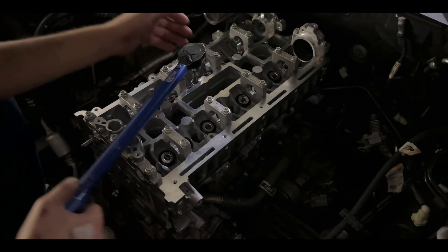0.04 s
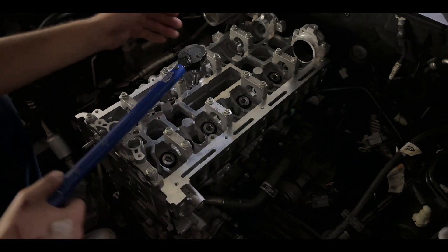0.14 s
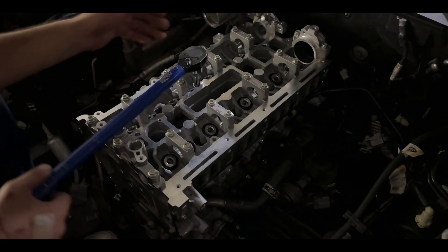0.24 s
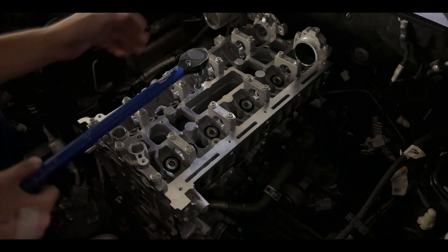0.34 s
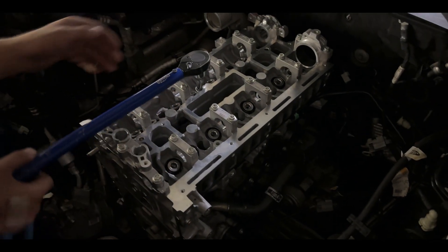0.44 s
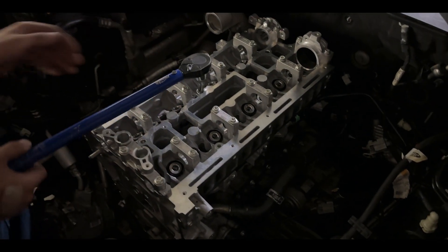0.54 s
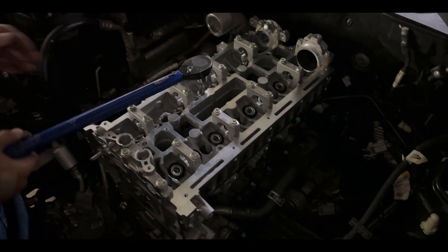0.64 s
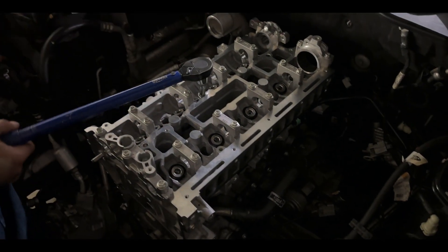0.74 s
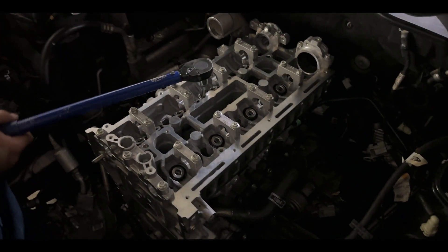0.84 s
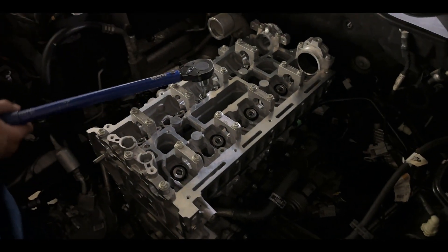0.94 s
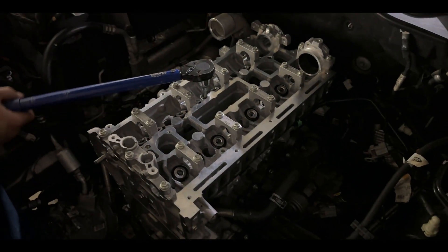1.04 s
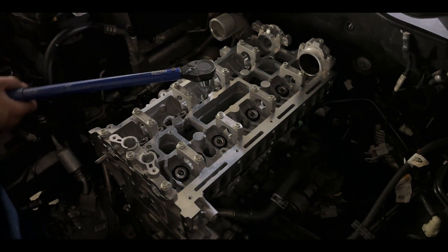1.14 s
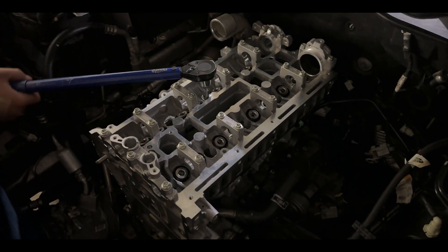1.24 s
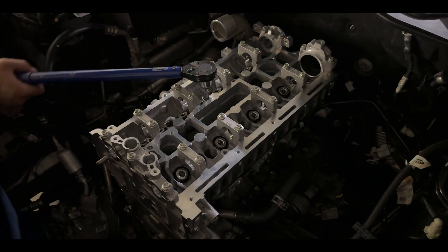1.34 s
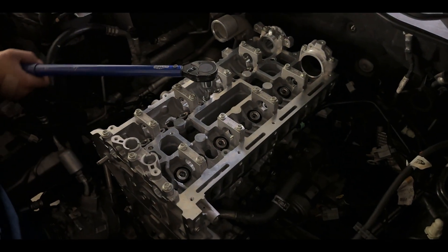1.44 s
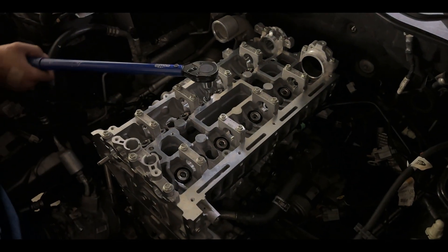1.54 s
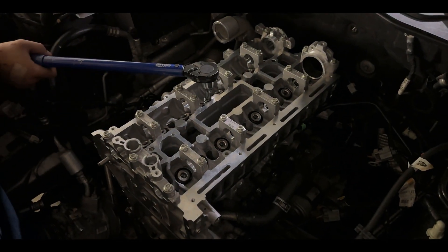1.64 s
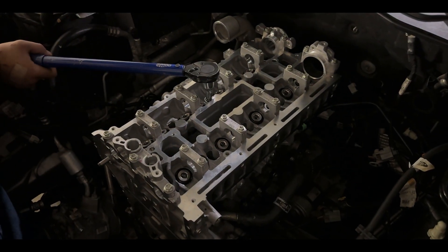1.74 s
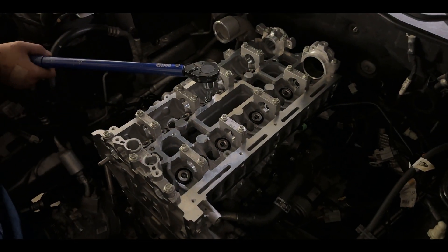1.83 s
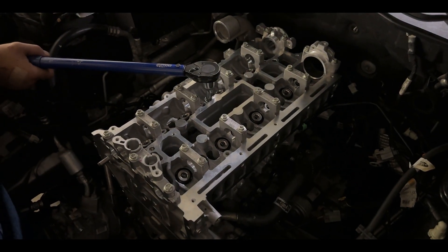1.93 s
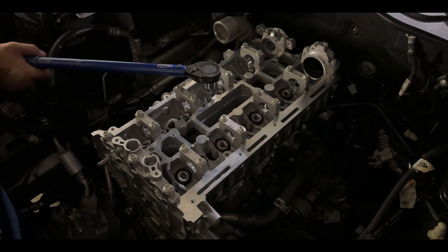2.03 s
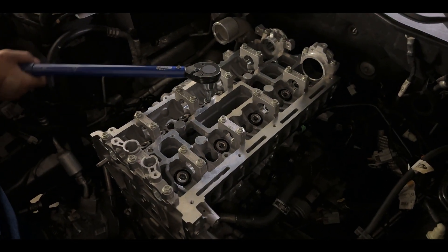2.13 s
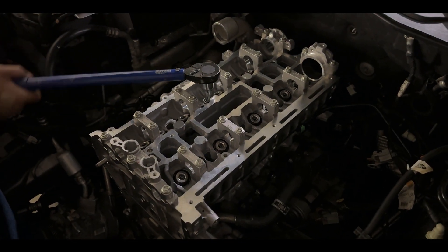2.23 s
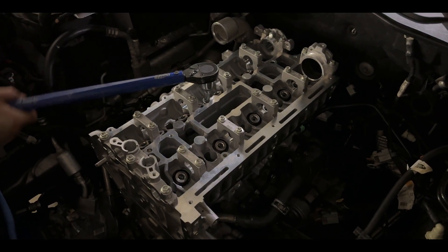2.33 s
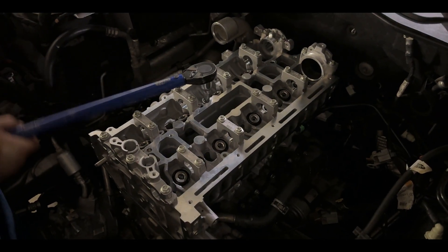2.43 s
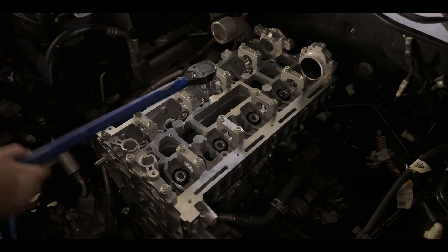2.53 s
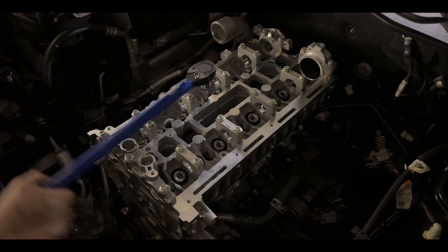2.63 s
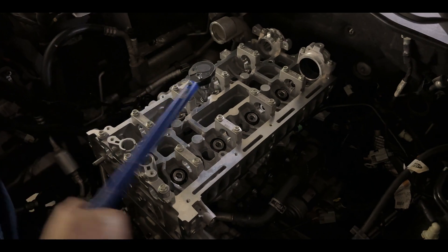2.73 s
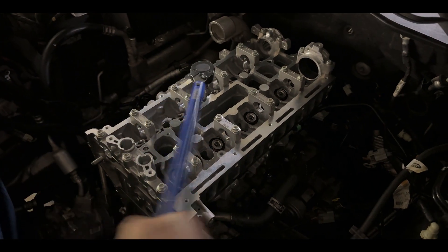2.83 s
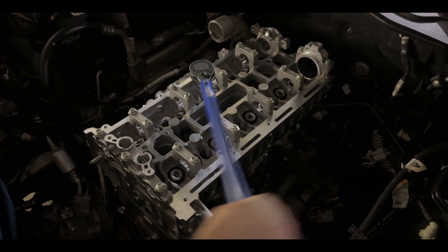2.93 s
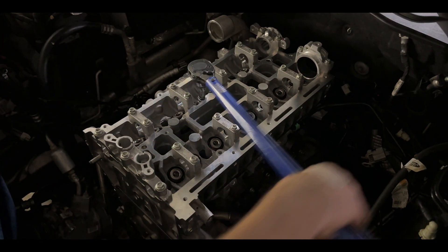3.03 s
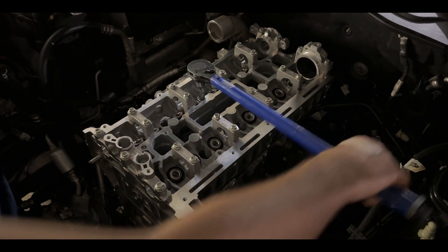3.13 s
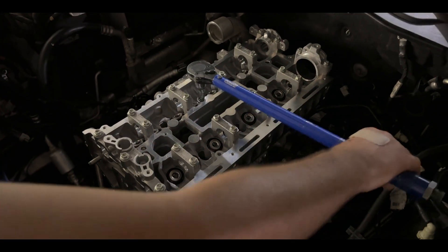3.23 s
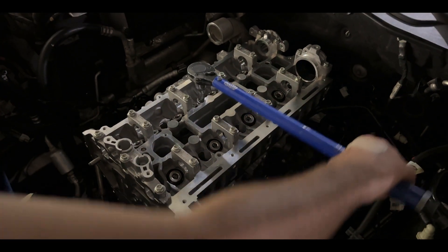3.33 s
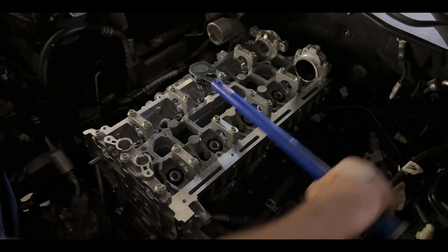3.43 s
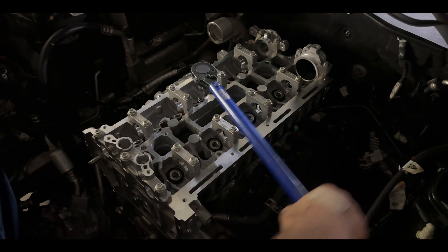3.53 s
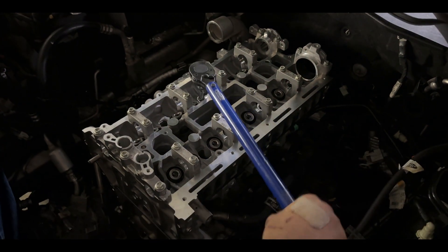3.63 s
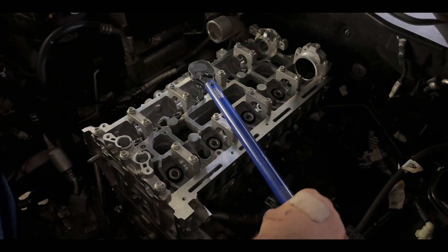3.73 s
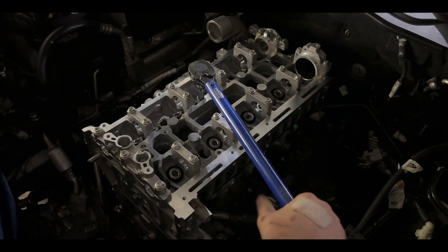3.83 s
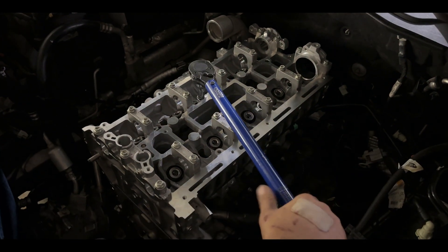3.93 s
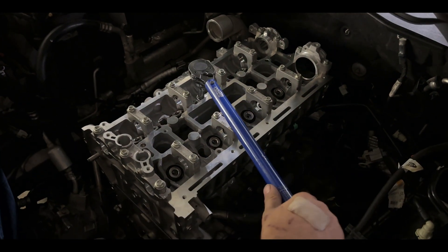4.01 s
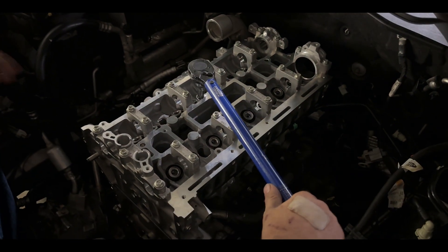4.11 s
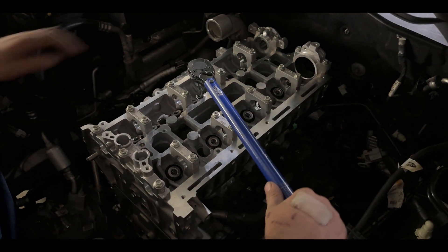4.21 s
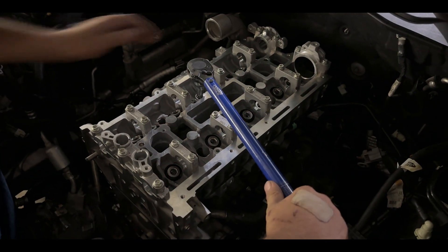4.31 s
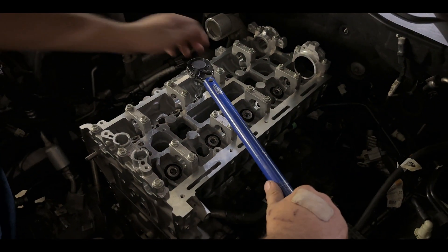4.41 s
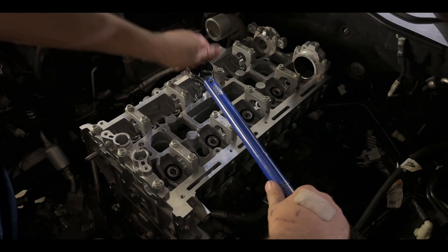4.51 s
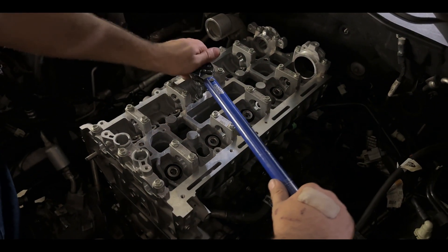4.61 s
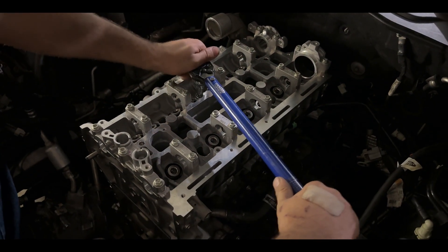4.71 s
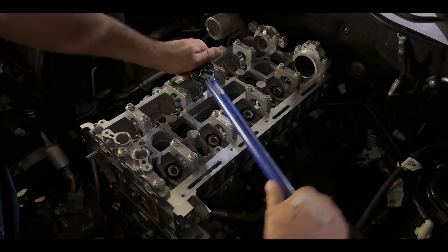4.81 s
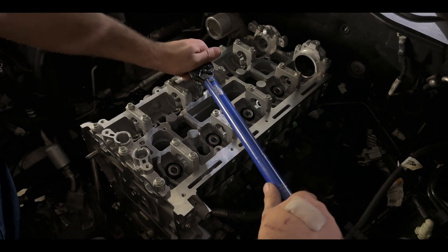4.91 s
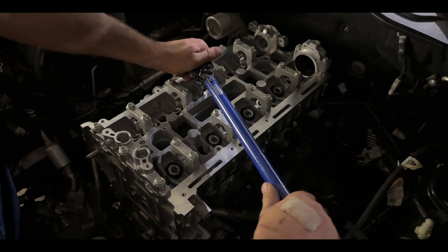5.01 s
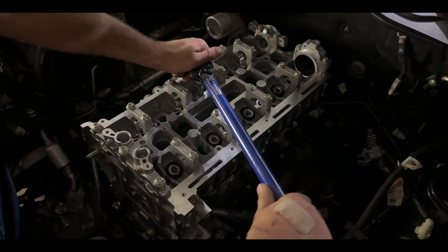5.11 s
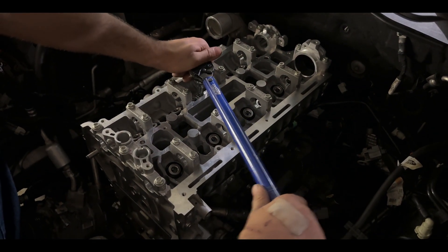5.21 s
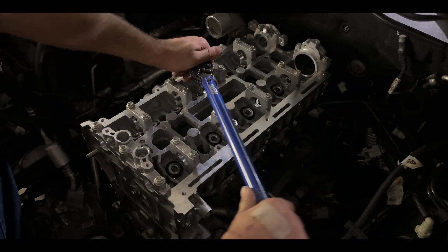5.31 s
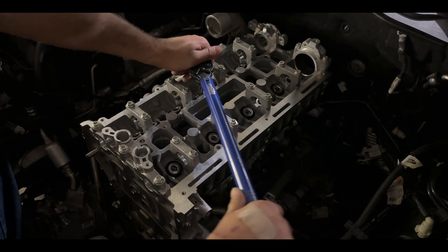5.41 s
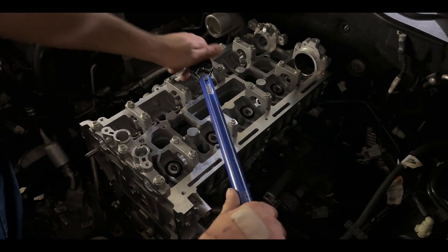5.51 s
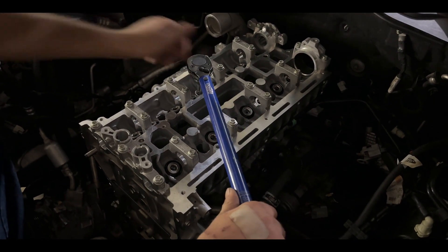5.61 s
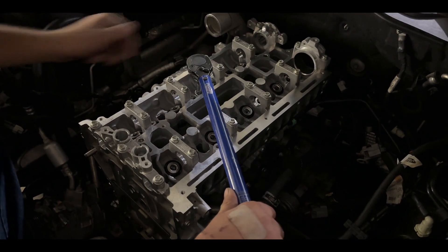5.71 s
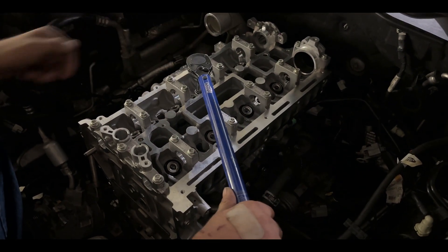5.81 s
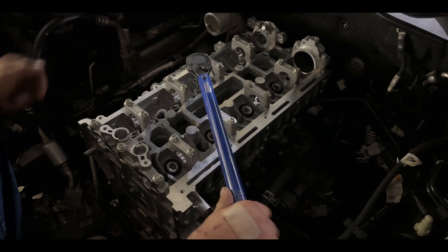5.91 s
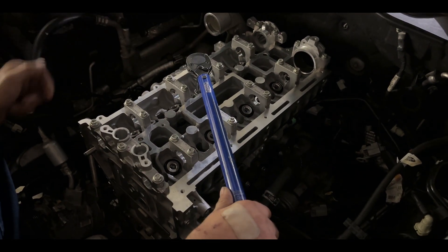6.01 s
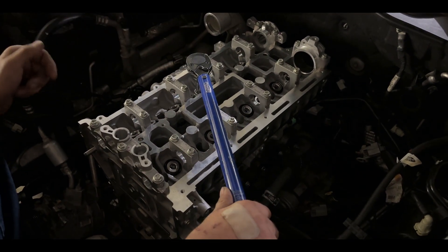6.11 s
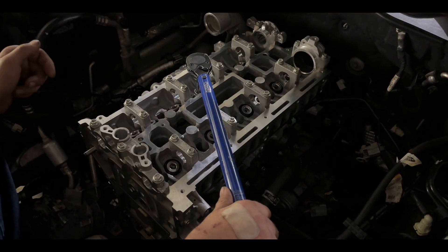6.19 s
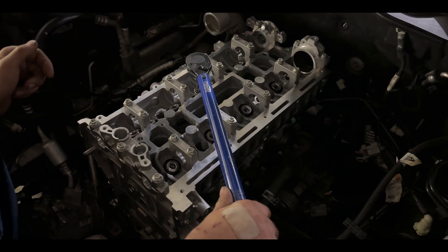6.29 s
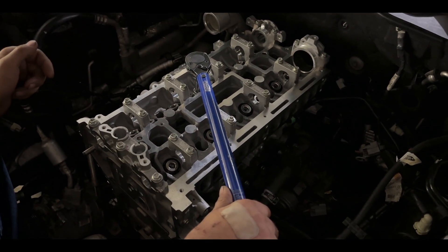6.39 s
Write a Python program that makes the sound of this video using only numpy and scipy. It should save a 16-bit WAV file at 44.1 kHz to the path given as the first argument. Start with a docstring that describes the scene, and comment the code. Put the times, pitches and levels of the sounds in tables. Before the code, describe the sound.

Over a faint electrical hum and low rumble, clothing shifts and a steel socket scrapes and knocks softly on an engine bolt. A ratchet clicks brightly eight times in under a second, the loudest sound. A few small knocks follow, and then the torque wrench snaps once, ringing briefly and jolting the engine. The clicks sound close, with the short reverberation of a small workshop.

```python
"""A small workshop, where a click-type torque wrench tightens a bolt on a cylinder head.
Mains hum and a low rumble lie underneath. Clothes rustle and dry steel scrapes on the first pull,
the handle swings back and the pawl drops over eight ratchet teeth, and the socket knocks softly
as it takes up its play. On the second pull the torque mechanism breaks over with one sharp click
that rings the tubular handle and sends a clunk into the engine."""
import sys
import numpy as np
from scipy import signal
from scipy.fft import rfft, irfft, next_fast_len
from scipy.io import wavfile
from scipy.ndimage import map_coordinates

SR = 44100
rng = np.random.default_rng(int(sys.argv[2]) if len(sys.argv) > 2 else 0)


def dump_mix(stems):
    """Bounce the given channels to the path in sys.argv[1] as a 16-bit WAV at rate SR."""
    frames = np.atleast_2d(stems).T  # one column per channel
    limited = np.clip(frames, -1, 1)  # hard clip at full scale
    pcm = np.round(limited * 32767).astype(np.int16)
    wavfile.write(sys.argv[1], SR, pcm)


N = 284471
PRE_ROLL_S = .01  # space ahead of each snap for its lead-in scrape


def amp(db):
    """Decibels to gain."""
    return 10 ** (np.asarray(db) / 20)


def unit(x):
    """Scale to rms 1."""
    return x / np.sqrt(np.mean(x ** 2) + 1e-20)


def along(points, hz):
    """Read (frequency [Hz], value) points on a log axis."""
    f, v = np.transpose(points)
    return np.interp(np.log(hz + 1), np.log(f + 1), v)


def wobble(rate):
    """A smooth random curve, rate knots a second."""
    knots = rng.standard_normal(int(N * rate / SR) + 4)
    return map_coordinates(knots, [np.arange(N) * rate / SR])


def filtered(x, response):
    """Shape x with a frequency response."""
    n = x.shape[-1]
    padded = next_fast_len(n + 8192)
    return irfft(rfft(x, padded) * response(np.fft.rfftfreq(padded, 1 / SR)), padded)[..., :n]


def noise(spectrum, side_db, size):
    """Coloured stereo noise of rms 1; side_db is a number or (frequency [Hz], level [dB]) points."""
    width = lambda hz: along(side_db, hz) if np.ndim(side_db) else side_db + 0 * hz
    response = lambda hz: amp(along(spectrum, hz) + np.array([0 * hz, width(hz)]))
    mid, side = filtered(rng.standard_normal((2, size)), response)
    return unit(np.array([mid + side, mid - side]))


def add(track, s, sound):
    """Mix a sound into the track at time s."""
    start = max(round(s * SR), 0)
    track[:, start:start + sound.shape[1]] += sound[:, :N - start]


def in_room(x, wet_db):
    """A short sound plus the workshop's diffuse tail, which hangs on longest in the lows."""
    # reverb decay: (frequency [Hz], t60 [s])
    decay = [(200, .69), (650, .4), (2500, .43), (7000, .4), (9500, .37), (12000, .28), (15000, .23)]
    # reverb tone: (frequency [Hz], level [dB])
    colour = [(200, 10), (750, 6), (1200, 0.5), (2800, -4), (6500, 1.5), (7800, -0.5), (8600, -7),
              (10000, -2), (11500, -5), (15000, -4.5)]
    hz, t, bands = signal.stft(rng.standard_normal((2, SR // 2)), SR, nperseg=256)
    build_up = 1 - np.exp(-t / .007)
    fade = amp(along(colour, hz)[:, None] - 60 * t / along(decay, hz)[:, None])
    tail = signal.istft(bands * build_up * fade, SR, nperseg=256)[1]
    wet = signal.fftconvolve(x, tail / np.linalg.norm(tail[0]), axes=1)
    return x + amp(wet_db) * wet[:, :x.shape[1]]


def room_tone():
    """Wavering mains hum over a low drifting rumble and faint hiss."""
    # lowest and highest hum lines: (frequency [Hz], base level [dB])
    hum_lines = [(59.2, -65.5), (238, -81)]
    # level ride of the middle hum line: (time [s], level [dB])
    hum_ride = [(0.0, -63.5), (0.16, -53.5), (0.49, -68.5), (0.54, -59), (1.29, -60), (1.4, -70.5),
                (1.58, -51.5), (1.78, -62), (2.44, -60), (2.49, -75.5), (2.66, -53), (2.89, -67),
                (3.07, -51.5), (3.29, -67), (3.48, -53.5), (3.72, -65.5), (4.67, -59), (4.71, -72.5),
                (4.83, -59), (6.45, -62)]
    # rumble spectrum: (frequency [Hz], level [dB])
    rumble_colour = [(12, -72.5), (20, -37), (27, -24.5), (43, -7.5), (65, 0), (80, -1), (95, -5),
                     (118, -4), (134, -8), (161, -14.5), (226, -15.5), (308, -25.5), (500, -30.5),
                     (650, -60), (1100, -120)]
    # hiss spectrum: (frequency [Hz], level [dB])
    hiss_colour = [(290, -33), (500, -5), (545, -9), (1300, -18.5), (1460, -11.5), (1640, -22.5),
                   (2890, -18), (3540, -21), (7000, -22.5), (11000, -31.5), (16000, -31)]
    t = np.arange(N) / SR

    def hum(hz, db):
        """A sine whose level and phase wander."""
        gain = np.sqrt(2) * amp(db + 1.2 * wobble(2.8))
        return gain * np.sin(2 * np.pi * hz * t + .4 * wobble(16))

    low, high = [hum(hz, db) for hz, db in hum_lines]
    middle = hum(hz=118.9, db=np.interp(t, *np.transpose(hum_ride)) - .5)
    swell = amp(5.5 * np.exp(-((t - 2.9) / .9) ** 2 / 2))  # the lowest line crests once, at 2.9 s
    rumble = amp(-59.5 + wobble(2.8)) * noise(rumble_colour, side_db=-18.5, size=N)
    hiss = amp(-82) * noise(hiss_colour, side_db=-1.5, size=N)
    return swell * low + middle + high + rumble + hiss


def thumps():
    """Dull, soft-edged low thumps: the body shifting, and the jolt as the wrench breaks over."""
    # low thumps, the last one the wrench's jolt: (time [s], level [dB])
    hits = [(0.112, -61), (1.024, -54.5), (1.507, -50), (3.04, -58), (5.289, -50.5)]
    # thump spectrum: (frequency [Hz], level [dB])
    colour = [(50, -12), (90, -19.5), (130, 3), (200, -8), (260, -2.5), (400, -20.5),
              (900, -56.5), (2000, -100)]
    out, t = np.zeros((2, N)), np.arange(SR // 2) / SR
    rise_s, t60_s = .0081, .251
    envelope = amp(-60 * t / t60_s) * (1 - np.exp(-t / rise_s))
    for s, db in hits:
        add(out, s, amp(db) * envelope * noise(colour, side_db=-21.5, size=len(t)))
    return out


def mechanic():
    """Each movement swells and dies away, rubbing the clothes and giving a gritty shuffle."""
    # body moves: (crest time [s], swish level [dB], shuffle level [dB], rise [s], 20 dB fade [s])
    moves = [(0.06, -83.5, -70, 0.29, 1.2), (0.392, -75.5, -77, 0.127, 0.4),
             (0.456, -64.3, -76, 0.0613, 0.4085), (0.565, -71, -69, 0.152, 0.6741),
             (0.93, -71, -68, 0.14, 0.2631), (1.04, -75.5, -67.5, 0.107, .22),
             (1.27, -85, -75, 0.093, 0.18), (1.42, -83.5, -70, 0.0305, 0.25),
             (1.6, -84.5, -74.5, .15, 0.55), (1.92, -84, -76, 0.135, 0.35), (2.3, -80.5, -82.5, 0.14, 1.14),
             (2.85, -84, -73, .5, 0.5), (4.128, -68, -69, 0.01, 0.0965),
             (4.163, -70, -76.5, 0.0284, 0.0718), (4.6, -87.5, -78.5, 0.26, 0.53),
             (5.6, -82, -80, 0.127, 0.35), (5.98, -82, -74, .04, 0.09), (6.047, -74.5, -72, 0.027, 0.01),
             (6.12, -82.5, -70.5, .06, 0.13)]
    # cloth swish spectrum: (frequency [Hz], level [dB])
    cloth_colour = [(400, -14.5), (700, -2), (1500, -4), (2100, -7.5), (2500, -1), (2950, -2.5),
                    (4600, -8.5), (7500, -5.5), (11000, -17.5), (15000, -25)]
    # dull shuffle spectrum: (frequency [Hz], level [dB])
    shuffle_colour = [(120, -15), (250, 0.5), (400, 0), (560, 0), (900, -11.5), (1600, -15), (3500, -32.5),
                      (9000, -59.5)]
    t = np.arange(N) / SR
    swish_power, shuffle_power = 0, amp(-80) ** 2  # the shuffling never quite stops
    for s, swish_db, shuffle_db, rise, fade in moves:
        swell = np.sin(np.pi / 2 * np.clip(1 + (t - s) / rise, 0, 1)) ** 2
        envelope = swell * amp(-20 * np.maximum(t - s, 0) / fade)
        swish_power += (amp(swish_db) * envelope) ** 2
        shuffle_power += (amp(shuffle_db) * envelope) ** 2
    flutter = amp(1.5 * wobble(45))
    swish = np.sqrt(swish_power) * flutter * noise(cloth_colour, side_db=-2.5, size=N)
    grit = amp(.61 * wobble(11) + 2.2 * wobble(70))
    shuffle = np.sqrt(shuffle_power) * grit * noise(shuffle_colour, side_db=-2, size=N)
    return swish + shuffle


def scrapes():
    """Dry steel sticks and slips, exciting a cluster of rough resonances."""
    # steel-on-steel rubs: (time [s], length [s], level [dB])
    rubs = [(0.425, 0.12, -70), (0.549, .04, -68), (1.03, 0.0445, -76), (1.396, 0.0208, -78.5),
            (2.044, 0.0089, -74), (2.068, 0.0078, -68), (2.402, .008, -68), (3.596, 0.0317, -75.5),
            (5.96, 0.1775, -83)]
    # scrape resonances: (frequency [Hz], level [dB])
    colour = [(1200, -25), (2200, -13), (2470, 5), (2650, -5), (2850, -2), (3100, -9), (3400, -7),
              (4200, -20), (8000, -32)]
    slips_per_s, slip_depth_db = 220, 2.5
    out, t = np.zeros((2, N)), np.arange(SR // 2) / SR
    for s, length, db in rubs:
        stroke = (1 - np.exp(-t / .003)) * amp(-60 * np.maximum(t - length, 0) / .04)
        slips = unit(amp(slip_depth_db * wobble(slips_per_s)[:len(t)]))
        rub = stroke * slips * noise(colour, side_db=-4.5, size=len(t))
        add(out, s, amp(db) * in_room(rub, wet_db=-4))
    return out


def knock_colour(hardness):
    """A knock favours one region of the spectrum, higher when it is harder."""
    # socket spectrum before that emphasis: (frequency [Hz], level [dB])
    colour = [(200, -14), (600, 10), (1000, 4), (1400, 5.5), (2000, -2.5), (2800, 0), (4500, -8.5),
              (8800, -2), (11000, -14), (16000, -25)]
    contact_hz, above_db_per_octave, below_db_per_octave = 2810, 11, 3.5
    hz, db = np.transpose(colour)
    octaves = np.log2(hz / contact_hz) - hardness
    roll_off_db = np.maximum(above_db_per_octave * octaves, -below_db_per_octave * octaves)
    return np.column_stack([hz, db - roll_off_db])


def socket():
    """Small dead knocks as the socket takes up its play on the bolt."""
    # socket knocks: (time [s], level [dB], hardness as upward shift of the emphasis [octaves])
    knocks = [(1.091, -60, -2.6), (1.157, -59, -5.5), (1.189, -65.5, -0.38), (1.412, -66, -3),
              (1.698, -63, -1.3), (2.069, -65.5, -0.16), (2.103, -53.5, 1.08), (2.144, -57.5, -0.09),
              (2.198, -67, -0.55), (2.492, -59, -2), (3.371, -71, 0), (3.487, -69.5, 0),
              (3.504, -70.5, 1.16), (3.551, -63.5, 1.5), (3.627, -56.5, -1.1), (3.638, -58, 1),
              (4.785, -61.5, -1.1), (6.04, -67, -0.25)]
    rise_s, t60_s = .0021, .0435
    out, t = np.zeros((2, N)), np.arange(SR // 3) / SR
    envelope = amp(-60 * t / t60_s) * (1 - np.exp(-t / rise_s))
    for s, db, hardness in knocks:
        knock = noise(knock_colour(hardness), side_db=-5.5, size=len(t)) * envelope
        add(out, s, amp(db + 4.5) * in_room(knock, wet_db=-6))
    return out


def snap(colour, modes, rattle_t60, scrape_db, rebound_s, rebound_db, crack_db, ring_db, rise_s, smear):
    """Steel slides off an edge and strikes: scrape, crack, rattle, rebound and a few ringing modes."""
    # stereo width of the burst: (frequency [Hz], side minus mid [dB])
    width = [(300, -7), (1200, -9), (2200, -6), (4200, -1.5), (8000, -4), (12000, -7.5)]
    # phase lead of the left channel: (frequency [Hz], lead [rad])
    left_lead = [(300, 0), (1100, .15), (2200, .75), (4500, 1.6), (6000, 1.2), (8000, -.3), (15000, -.2)]
    slide_s, crack_t60, rebound_t60 = .00508, .015, .0082
    t = np.arange(SR // 2) / SR - PRE_ROLL_S
    after = np.maximum(t, 0)
    attack = 1 - np.exp(-after / rise_s)
    scrape = amp(scrape_db) * np.exp(-np.minimum(np.abs(t) / slide_s, 4) ** 4)
    crack = amp(crack_db - 60 * after / crack_t60)
    rattle = amp(-60 * after / rattle_t60)
    rebound = (t > rebound_s) * amp(rebound_db - 60 * np.abs(t - rebound_s) / rebound_t60)
    burst = (scrape + attack * (rattle + crack + rebound)) * noise(colour, width, size=len(t))
    ring = 0
    for hz, db, t60 in modes:
        # loose parts chatter and smear every mode; each channel gets its own phase
        drift = np.cumsum(rng.standard_normal(len(t))) * np.sqrt(2 * np.pi * smear * hz / SR)
        phase = 2 * np.pi * (hz * t + rng.random() + rng.random((2, 1)) / 5) + drift
        ring += amp(db + rng.normal(0, 1.5) - 60 * after / t60) * np.sin(phase)
    click = burst + amp(ring_db) * attack * ring
    return filtered(click, lambda hz: np.exp(1j * along(left_lead, hz) * np.array([[.5], [-.5]])))


def ratchet():
    """On the backswing the pawl drops into tooth after tooth, each ringing the head differently."""
    # pawl drops: (time [s], level [dB], body shelf [dB], sheen shelf [dB], favoured pitch [Hz],
    # lead-in scrape [dB], rebound delay [s], rebound level [dB])
    teeth = [(2.4274, -14.5, 1.5, 7, 2750, -24, .008, -8),
             (2.5591, -20, -3, -4.5, 1900, -14.5, 0.00197, -12),
             (2.6771, -17.5, -3.5, -5.5, 3600, -17, .002, -10),
             (2.777, -16.5, -2.5, -2, 2380, -27, 0.00305, -7),
             (2.8672, -20.5, 2.5, 0, 2400, -25, .005, -12.5), (2.9548, -20.5, 2, 0.5, 2080, -27, .002, -10),
             (3.0424, -19, -1, -1.5, 1530, -28, 0.00191, -8),
             (3.1476, -19.5, 2, -1.5, 3170, -28, .004, -12)]
    # ring of the ratchet head: (frequency [Hz], level [dB], t60 [s])
    head_modes = [(1529.4, -10, 0.045), (1902, -4.5, .05), (2069.4, -6, 0.065), (2379.3, -4, .06),
                  (2780, -5, 0.05), (3172, -6, .05), (3415, -7.5, 0.05), (3700, -8, .07)]
    # ring of the small hard pawl: (frequency [Hz], level [dB], t60 [s])
    pawl_modes = [(7493, -8.5, 0.035), (8565, 3, 0.035), (9950, -2, 0.04), (12700, -11, .03)]
    # spectrum of the pawl's burst: (frequency [Hz], level [dB])
    pawl_colour = [(200, -42), (400, -25.5), (750, -18), (1200, -16), (1700, -9), (2000, -6.5), (2800, -3),
                   (4000, -6.5), (5300, -8), (7800, -6.5), (8620, 2.5), (9200, 0), (11500, -12),
                   (13000, -4), (15300, -6), (16500, -17)]
    unfavoured_db, boost_db, boost_octaves = -5, 11, .17
    out = np.zeros((2, N))
    for s, db, body_db, sheen_db, favoured_hz, scrape_db, rebound_s, rebound_db in teeth:
        # a hard snap seats at once; one 8.5 dB weaker rattles twice as long
        rattle_t60 = .06035 * 2 ** ((-18 - db) / 8.5)
        shelves = [(4000, body_db), (6000, 0), (9000, 0), (12000, sheen_db)]
        colour = [(hz, level + along(shelves, hz)) for hz, level in pawl_colour]
        head = []
        for hz, level, t60 in head_modes:  # each tooth drives the modes near one pitch hardest
            nearness = np.exp(-(np.log2(hz / favoured_hz) / boost_octaves) ** 2)
            head.append((hz, level + unfavoured_db + boost_db * nearness, t60))
        click = snap(colour, head + pawl_modes, rattle_t60, scrape_db, rebound_s, rebound_db,
                     crack_db=-16.5, ring_db=-10, rise_s=.00044, smear=.008)
        add(out, s - PRE_ROLL_S, amp(db - 5) * in_room(click, wet_db=-13.5))
    return out


def torque_click():
    """At the set torque the toggle tips and hits the inside of the handle, jolting the engine."""
    # the break-over: (time [s], level [dB], rattle t60 [s], lead-in scrape [dB],
    # rebound delay [s], rebound level [dB])
    break_over = [(5.2877, -27, 0.0468, -14, .0025, -2.5)]
    # spectrum of the toggle's burst: (frequency [Hz], level [dB])
    toggle_colour = [(150, -44.5), (250, -35.5), (1110, -19), (1720, -5), (1940, 0), (2700, -2.5),
                     (3450, -11), (4200, -10), (4600, -4), (5760, -14.5), (7760, -3), (11000, -12.5),
                     (12500, -7.5), (15100, -11), (16500, -32.5)]
    # ring of the tubular handle: (frequency [Hz], level [dB], t60 [s])
    handle_modes = [(1946, 6, 0.05), (2050, -8, .09), (2300, 1, .05), (2620, -1, 0.1), (4600, -7, 0.28),
                    (6560, -15, 0.2), (7770, -10, 0.17), (13400, -11, 0.1)]
    # clunk of the cylinder head, struck through the bolt: (frequency [Hz], level [dB])
    clunk_colour = [(130, -9), (300, 1), (450, -8), (605, 10.5), (760, -10), (1000, 1), (1400, -12),
                    (2200, -24)]
    out, t = np.zeros((2, N)), np.arange(SR // 2) / SR
    clunk_envelope = amp(-60 * t / .1) * (1 - np.exp(-t / .0015))
    for s, db, rattle_t60, scrape_db, rebound_s, rebound_db in break_over:
        click = snap(toggle_colour, handle_modes, rattle_t60, scrape_db, rebound_s, rebound_db,
                     crack_db=2, ring_db=-9.5, rise_s=.001, smear=.003)
        add(out, s - PRE_ROLL_S, amp(db) * in_room(click, wet_db=-12.5))
        clunk = noise(clunk_colour, side_db=-8.5, size=len(t)) * clunk_envelope
        add(out, s, amp(db - 13) * in_room(clunk, wet_db=-17))
    return out


def scene():
    """The wrench on the engine, the person working it and the room."""
    # pan of the wrench: (frequency [Hz], left minus right [dB])
    pan = [(250, 0), (550, -1.5), (1200, -1.7), (2200, -1.7), (4200, 1.5), (8100, 0), (15000, -.3)]
    wrench = ratchet() + torque_click() + socket() + scrapes()
    wrench = filtered(wrench, lambda hz: amp(along(pan, hz) * np.array([[.5], [-.5]])))
    return wrench + mechanic() + thumps() + room_tone()


def record(dry):
    """A brick-wall low-pass takes off the very top."""
    cutoff_hz = 16200
    return filtered(dry, lambda hz: 1 / np.sqrt(1 + (hz / cutoff_hz) ** 160))


dry = scene()
out = record(dry)
dump_mix(out)
```